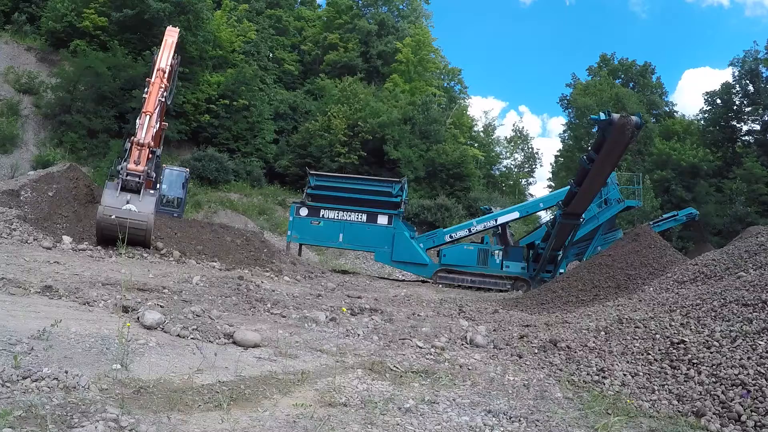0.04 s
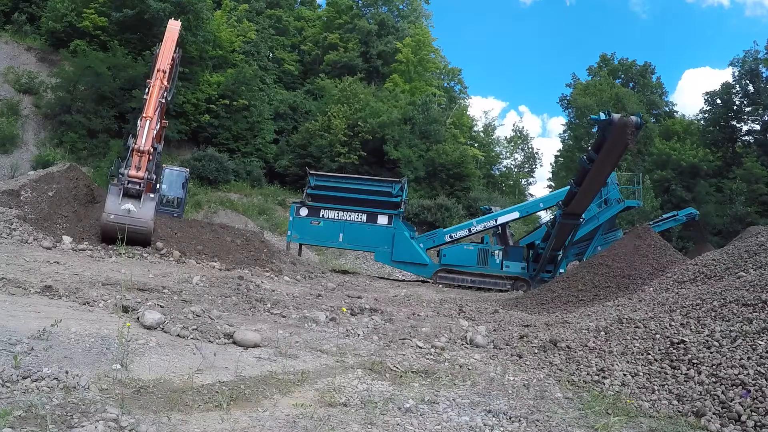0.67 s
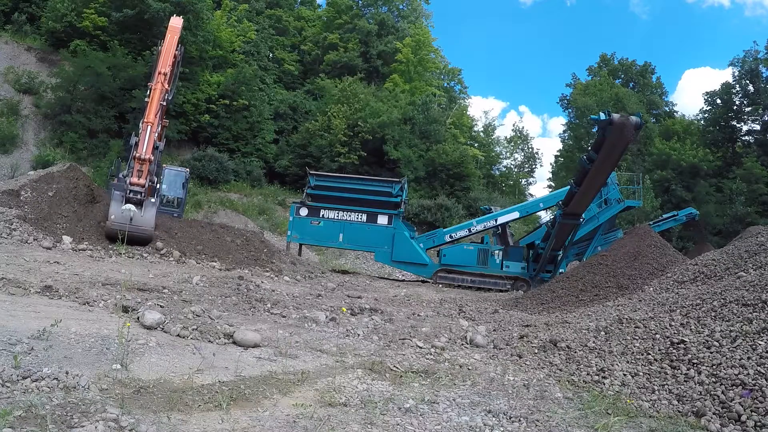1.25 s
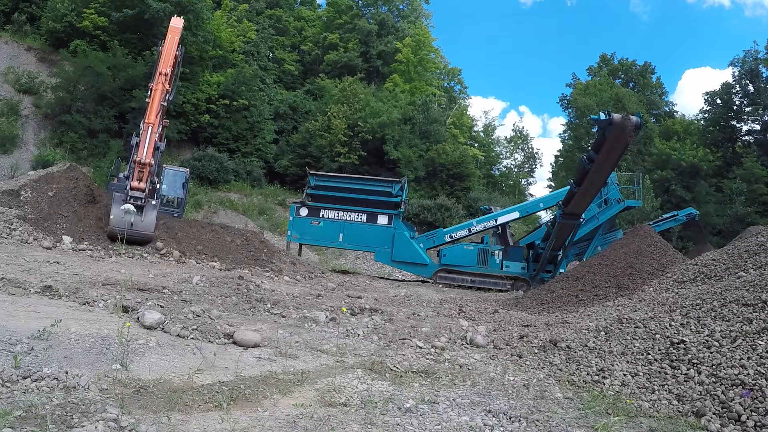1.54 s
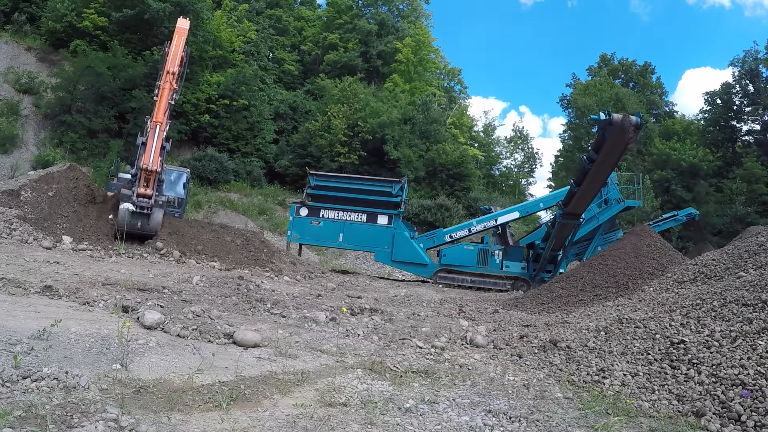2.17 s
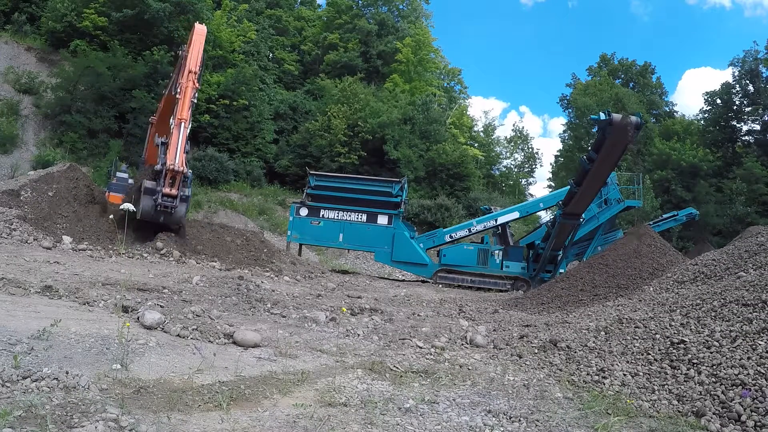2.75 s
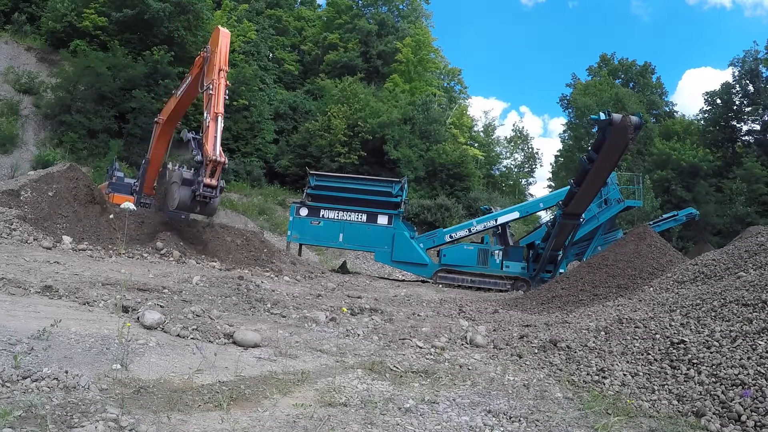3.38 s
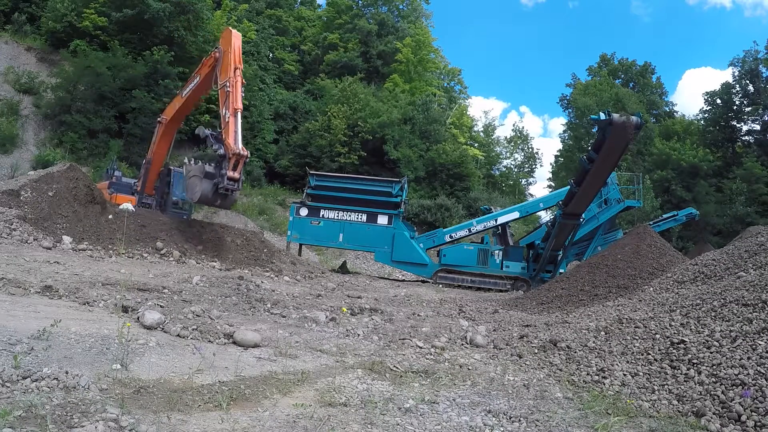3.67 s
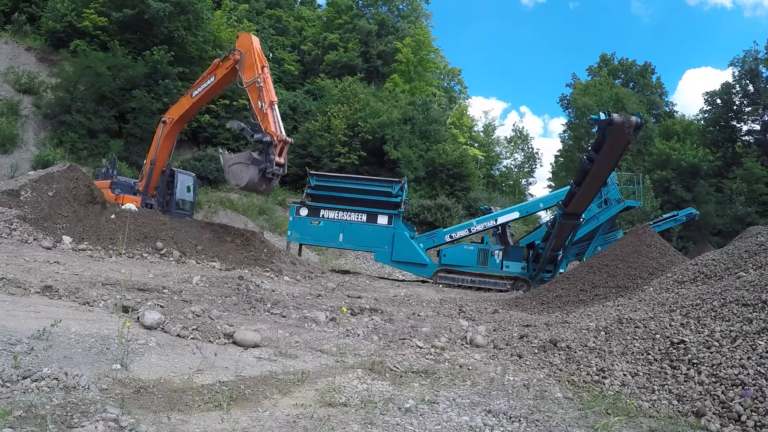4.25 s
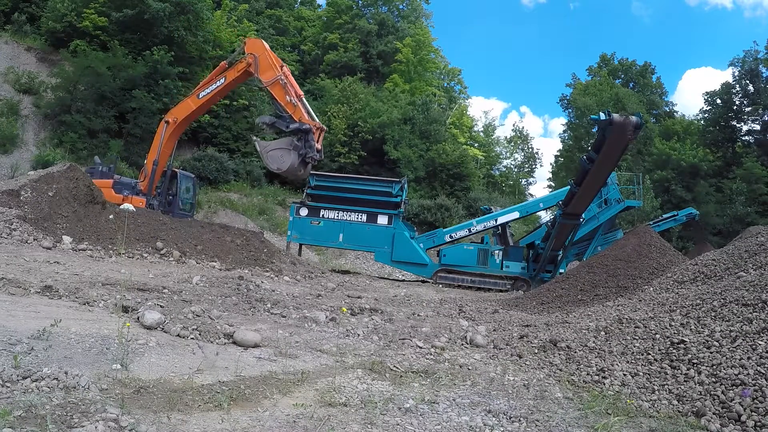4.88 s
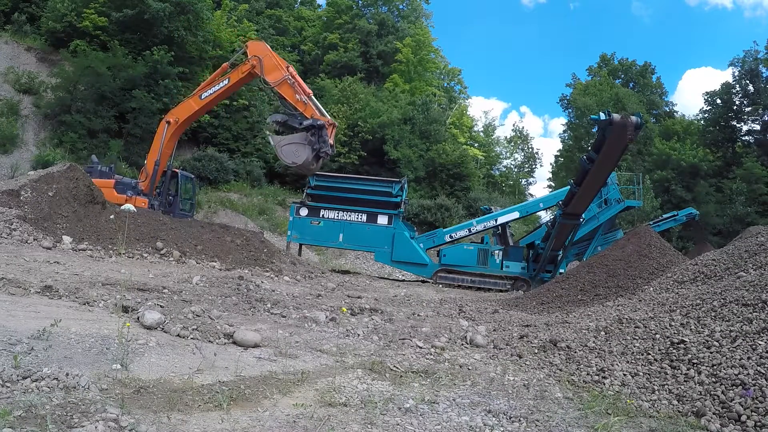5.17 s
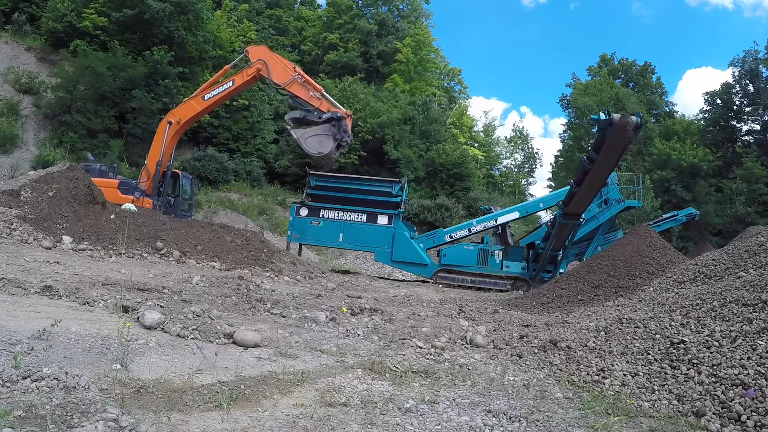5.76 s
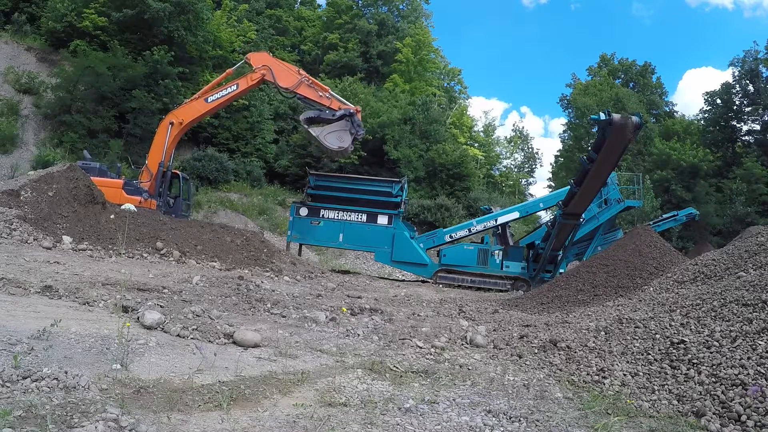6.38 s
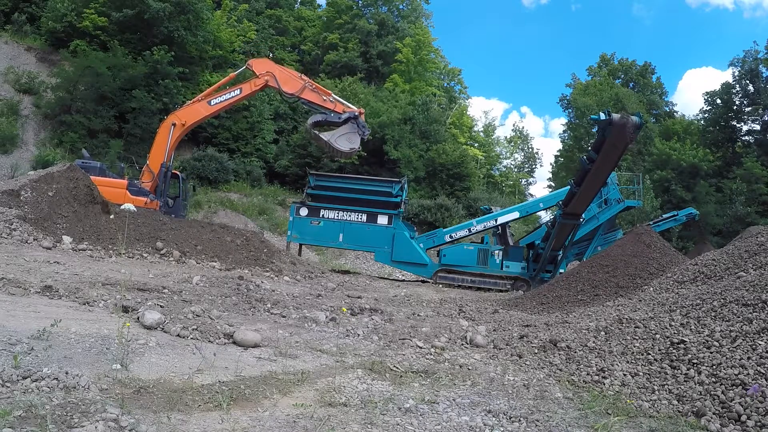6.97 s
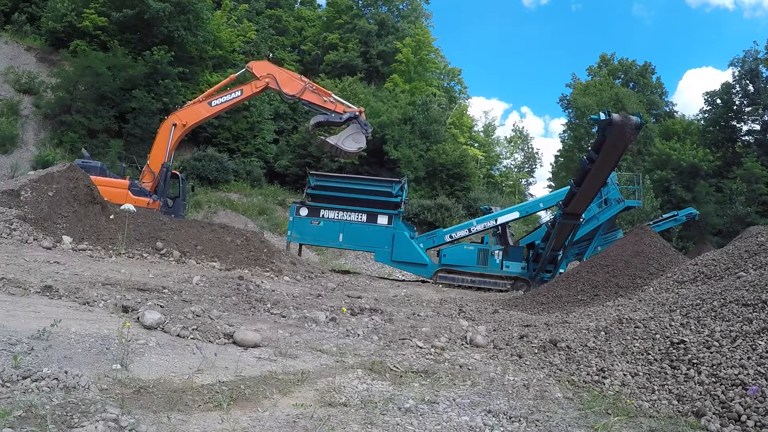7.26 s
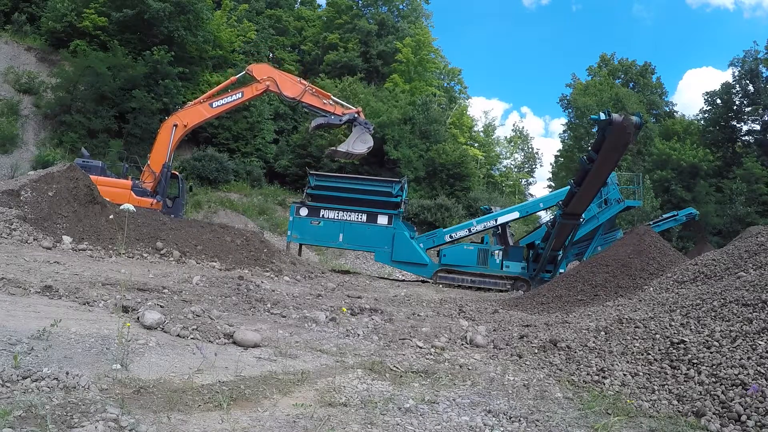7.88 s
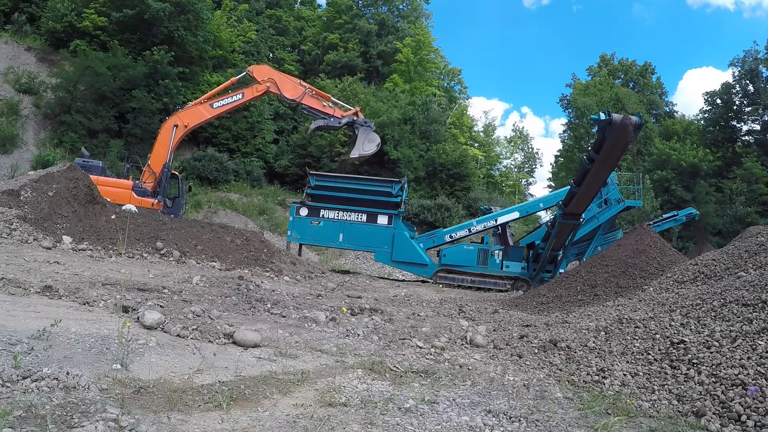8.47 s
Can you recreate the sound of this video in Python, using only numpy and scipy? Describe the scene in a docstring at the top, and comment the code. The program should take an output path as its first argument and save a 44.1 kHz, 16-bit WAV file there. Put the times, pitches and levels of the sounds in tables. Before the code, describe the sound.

A gravel screening machine rattles and sizzles over a deep diesel drone while a distant excavator thumps, growls and clanks once.

```python
"""Gravel screen across the pit

One microphone, across the pit from a screening plant and an excavator. The screen box shakes 19 times
a second, so stones rattle and ping on its deck; a loose plate chatters and two diesels drone. Dull
thumps and a boom come first, the excavator growls as it digs, then a bucket clank and another boom."""
import sys
import numpy as np
from scipy import signal
from scipy.fft import rfft, irfft, next_fast_len
from scipy.io import wavfile
from scipy.ndimage import map_coordinates

SR = 44100
rng = np.random.default_rng(int(sys.argv[2]) if len(sys.argv) > 2 else 0)


def int16_out(signal):
    """Quantize to a 16-bit WAV file."""
    q = np.round(np.clip(np.atleast_2d(signal).T, -1, 1) * 32767)
    wavfile.write(sys.argv[1], SR, q.astype(np.int16))


N = 380141
T = np.arange(N) / SR

# material passing over the deck: (time [s], level [dB])
FEED_LEVEL = [(0.13, -32), (1.3, -33), (2.9, -32.5), (3.7, -33.5), (4.6, -33.5), (6.1, -33.5), (6.6, -34),
              (7.4, -34), (8.15, -35.3), (8.5, -34.2)]
# rattle of the stones: (frequency [Hz], gain [dB])
STONE_SPECTRUM = [(915, -17), (1030, -6.5), (1200, 0.5), (1290, -6.5), (1360, -5), (1650, -7), (1760, -7.5),
                  (2170, -1.5), (2660, -6), (2740, -11), (3050, -3.5), (3210, -9.5), (3480, -7),
                  (3690, -20)]
# sizzle of the grit: (frequency [Hz], gain [dB])
GRIT_SPECTRUM = [(2150, -16), (3650, -23.5), (3740, -4), (4080, 0.5), (4280, -6), (4650, 1.5), (4960, -13),
                 (5080, -18), (5520, -4), (6070, -11.5), (7380, -13.5), (8600, -19), (10800, -22),
                 (12200, -18.5), (15000, -29.5)]
# broad resonances of the screen box: (frequency [Hz], width [Hz], gain [dB])
BOX_RESONANCES = [(1126, 47, -0.5), (1193, 28, 1.5), (2186, 25, 1), (2228, 104, -0.5), (3042, 110, -3)]
# ringing wires of the steel mesh: (frequency [Hz], relative level [dB])
MESH_MODES = [(4030, -1.5), (4085, -4), (4240, -4.5), (4480, -5), (4710, -2.5), (4807, 2), (5105, -7),
              (5320, -7.5), (5519, -2), (5585, -4.5), (5750, -11.5), (6200, -7.5), (6363, -16.5),
              (6656, -8), (6797, -7.5), (6920, -17), (7129, -4), (7245, -10), (7385, -10.5), (7610, -9),
              (7699, -17), (8150, -13.5), (8610, -15.5), (9130, -15), (9280, -18), (9600, -17.5),
              (10200, -16.5), (10770, -22), (11830, -17), (12480, -22)]
# short pours of fine grit: (middle [s], length [s], level [dB])
GRIT_POURS = [(1.3, 0.2, -52), (2.25, 0.63, -49), (2.8, 0.94, -46.5), (3.45, 0.25, -47), (5.22, 0.14, -49),
              (5.73, 0.17, -47), (6.2, 0.68, -49.5), (7.1, 0.4, -51), (8.48, 0.53, -47)]
# hiss of a pour: (frequency [Hz], gain [dB])
POUR_SPECTRUM = [(3800, -1), (5600, 2), (7200, 7), (8200, -6), (10000, -6), (12400, -7), (15000, -17)]
# large stones landing on the deck: (time [s], relative peak [dB])
STONE_CLACKS = [(0.7357, -26), (0.925, -19.5), (1.04, -20), (1.1413, -18), (1.2979, -17.5), (1.449, -18),
                (1.7724, -18), (1.789, -20), (2.2967, -30)]
# dry clack of one stone: (frequency [Hz], gain [dB])
CLACK_SPECTRUM = [(900, -8), (2200, -1), (3200, 5), (4500, -6.5), (7500, -21), (14000, -39)]
# runs of pings from a deck bar: (start [s], length [s], gap [s], relative peak [dB], pitch [Hz])
PING_RUNS = [(0.515, 0.05, 0.1, -37, 4800), (0.608, 0.05, 0.1, -39, 4500),
             (1.141, 0.25, 0.106, -34.5, 4790), (1.556, 0.05, 0.1, -33, 4807),
             (1.932, 1.0, 0.1055, -39, 4807), (2.841, 0.05, 0.11, -37, 5519), (3.257, 0.05, 0.1, -40, 4807),
             (3.865, 0.05, 0.1, -37, 4807), (4.185, 0.5, 0.212, -34, 4807),
             (4.974, 0.2, 0.147, -36.5, 4800), (5.474, 0.15, 0.094, -38.5, 4807),
             (6.044, 0.35, 0.16, -37.5, 4807), (6.116, 0.05, 0.1, -39, 5470), (8.403, 0.05, 0.1, -34, 4807)]
# deep throb near 38 Hz: (time [s], relative level [dB])
THROB_LEVEL = [(0.2, -33.5), (0.32, -38), (1.04, -25.5), (1.13, -38.0), (1.61, -41), (2.27, -29),
               (2.45, -39), (2.63, -27), (2.81, -38), (3.65, -27), (4.13, -32.0), (4.28, -47), (5.57, -30),
               (6.44, -38), (6.53, -33), (6.95, -30.0), (7.19, -37), (7.64, -40.5), (7.94, -28),
               (8.54, -34.0)]
# low booms at the pitch of the throb: (middle [s], length [s], level [dB])
LOW_BOOMS = [(0.49, 0.3, -23.5), (3.27, 0.34, -17)]
# pace of the loose plate: (time [s], rate [taps/s])
CHATTER_RATE = [(5.0, 20.16), (5.95, 21.5), (6.65, 21.5), (6.9, 20.1)]
# bouts that change how hard the plate knocks: (middle [s], length [s], extra level [dB])
CHATTER_BOUTS = [(0.53, 0.33, 5), (1.0, 0.77, 6), (1.78, 0.14, 11), (2.42, 0.44, 7.5), (3.6, 0.6, 2),
                 (4.35, 0.6, 3.5), (4.98, 1, 4.5), (5.93, 0.67, 7.5), (6.65, 0.5, -1), (8.55, 0.26, 2)]
# hollow tone of the chute: (frequency [Hz], gain [dB])
CHUTE_SPECTRUM = [(400, -22), (540, -12.5), (600, 0), (700, -1), (830, 1), (870, -10.5), (920, -18),
                  (1100, -56)]
# the excavator's growl as it digs: (middle [s], length [s], level [dB])
DIG_SWELLS = [(1.62, 1.8, -32.5)]
# dull thumps from the excavator: (time [s], peak [dB])
HULL_THUMPS = [(0.220, -16.5), (0.243, -20), (0.2905, -6.5), (0.321, -19), (0.352, -20)]
# ringing of its hull: (frequency [Hz], relative level [dB], t60 [s])
HULL_MODES = [(62.4, -10, 0.37), (124, -9, 0.13), (185.7, -6, 0.42), (243, -6, 0.11), (291, -5.5, 0.11),
              (362, -8, 0.066)]
# noise of a thump: (frequency [Hz], gain [dB])
THUD_SPECTRUM = [(150, -3), (300, -5), (480, -9), (800, -9), (950, -20)]
# contacts on the bucket: (time [s], peak [dB], dulling by a soft contact [dB/octave])
BUCKET_CLANKS = [(2.992, -24, 26), (3.0392, -8.8, 0), (3.0465, -18.5, 0)]
# ringing of the bucket: (frequency [Hz], relative level [dB], t60 [s])
BUCKET_MODES = [(1070, -3, 0.08), (1410, -2, 0.054), (1550, 8, 0.03), (1650, 5, 0.043), (2040, 1, 0.044),
                (2230, 6, 0.047), (2780, 1, 0.043), (3050, 0, 0.053), (3830, -13, .06), (4550, -15, .05)]
# noise of a clank: (frequency [Hz], gain [dB])
CRACK_SPECTRUM = [(1100, 1), (1500, 5), (1800, -1), (4300, 3), (5200, -7), (7000, -19), (12000, -33)]
# diesel firing tone: (time [s], level [dB])
FIRING_LEVEL = [(0.45, -32), (1.17, -29), (1.35, -36), (2.37, -28.5), (2.46, -38), (2.85, -33),
                (4.17, -28.5), (4.29, -35.5), (4.65, -29.5), (5.67, -39.5), (5.76, -33.5), (6.6, -28.5),
                (7.32, -42), (7.53, -30), (7.74, -28.5), (7.92, -37.5), (8.13, -31), (8.55, -30.5)]
# steady tones of engines, fans and pumps: (frequency [Hz], relative level [dB])
WHINE_TONES = [(93.5, -44), (114.3, -46), (168.5, -45.5), (224.5, -50), (243, -51.5), (348.3, -47),
               (393, -54.5), (448, -59), (695.5, -63), (1012, -56), (1069.5, -60.5), (1153, -46.5),
               (1184.5, -51), (1203.3, -48.5), (1645, -49.5)]
# exhaust rumble: (frequency [Hz], gain [dB])
EXHAUST_SPECTRUM = [(28, -7), (42, 1.5), (58, -1.5), (110, -2.5), (138, -6.5), (175, -7), (215, -8.5),
                    (288, -8), (310, -16), (380, -14), (470, -18.5), (530, -24.5), (600, -33.5)]


def gravel(shaft):
    """Stones and grit, fed in uneven surges, are tossed once a turn and land ringing box and mesh."""
    feed_db, = curves(FEED_LEVEL)
    surge = wobble(24)
    stones_db = feed_db + 0.69 * surge
    grit_db = feed_db - 13.5 + 1.13 * surge
    toss = np.cos(shaft)
    clumps = wobble(70)
    stone_hits = impacts(rate=3500, spread_db=0) * amp(0.61 * clumps + 0.12 * toss)
    stones = unit(coloured(stone_hits, STONE_SPECTRUM))
    box = unit(resonate(impacts(rate=1500, spread_db=7) * amp(0.34 * toss), BOX_RESONANCES))
    grit_hits = impacts(rate=7000, spread_db=2.5) * amp(clumps + 0.44 * toss)
    grit = unit(coloured(grit_hits, GRIT_SPECTRUM))
    rattle = amp(stones_db) * (amp(-0.26) * stones + amp(-6) * box)
    sizzle = amp(grit_db) * (amp(1.5) * grit + amp(1) * mesh(toss, t60=0.062, rate=130))
    return rattle + sizzle + pours(clumps)


def mesh(toss, t60, rate):
    """Each wire is hit by its own stones and rings briefly."""
    t = np.arange(SR // 8) / SR
    envelope = amp(-60 * t / t60) * (1 - np.exp(-t / 0.003))
    out = np.zeros(N)
    for hz, db in MESH_MODES:
        hits = impacts(rate, spread_db=6) * amp(toss)
        wire = np.sin(2 * np.pi * hz * t) * envelope
        out += amp(db) * unit(signal.oaconvolve(hits, wire)[:N])
    return unit(out)


def pours(clumps):
    """Fine grit runs in short pours, its tiny impacts merging into a hiss."""
    grains = impacts(rate=4000, spread_db=-1) * amp(1.5 * clumps)
    return swells(GRIT_POURS) * unit(coloured(grains, POUR_SPECTRUM))


def large_stones():
    """Single stones stand out: dry clacks, and pings that repeat as the deck tosses them again."""
    clacks = strikes(STONE_CLACKS, lambda: coloured(burst(t60=0.22), CLACK_SPECTRUM))
    bar_hits = [(start + delay, db, hz)
                for start, length, gap, db, hz in PING_RUNS for delay in np.arange(0, length, gap)]
    pings = strikes(bar_hits, lambda hz: ring([(hz, 0, 0.085), (hz * 1.483, -19, 0.08)], attack=0.012))
    return amp(-2.5) * clacks + amp(2) * pings


def hum_and_throb(shaft):
    """A 19 Hz hum under a deep throb near 38 Hz that twice swells into a boom."""
    throb_db, = curves(THROB_LEVEL)
    throb = amp(throb_db - 0.4 + 2 * wobble(9)) + swells(LOW_BOOMS)
    return np.sqrt(2) * (amp(-39) * np.sin(shaft) + throb * np.sin(2 * shaft + 1.4 * wobble(3.8)))


def loose_plate():
    """A plate taps about 20 times a second, hard and soft in turn, over the hollow rush of the chute."""
    hard_tap_s, rebound_db = 0.486, -2.5
    cycles = phase(curves(CHATTER_RATE)[0]) / (2 * np.pi)
    count = np.floor(cycles - np.interp(hard_tap_s, T, cycles))
    scatter_db = 3.5 * np.clip(rng.standard_normal(N), -2, 1)
    force_db = -35 + swells(CHATTER_BOUTS, height=float) + rebound_db * (count % 2) + scatter_db
    knocks = np.diff(count, prepend=count[0]) * amp(force_db)
    tap = coloured(signal.unit_impulse(SR // 8), CHUTE_SPECTRUM)
    chatter = signal.fftconvolve(knocks, tap / np.abs(tap).max())[:N]
    rush = unit(coloured(rng.standard_normal(N), CHUTE_SPECTRUM))
    return chatter + amp(-46) * rush


def excavator():
    """The machine growls under load, its hull thumps and its bucket clanks in the distance."""
    load = swells(DIG_SWELLS) * amp(2 * wobble(8))
    growl = np.sqrt(2) * load * np.sin(phase(91.3 + 1.36 * wobble(5.9)))
    return growl + strikes(HULL_THUMPS, thump) + strikes(BUCKET_CLANKS, clank)


def thump():
    """A heavy blow rings the hull's low modes under a dull thud."""
    return ring(HULL_MODES, attack=0.003) + 3.6 * coloured(burst(t60=0.083), THUD_SPECTRUM)


def clank(db_per_octave):
    """One contact cracks and rings the bucket; a soft one is dulled above 1 kHz."""
    hit = ring(BUCKET_MODES, attack=0.00066) + 1.5 * coloured(burst(t60=0.041), CRACK_SPECTRUM)
    return coloured(hit, [(500, 0), (1000, 0), (16000, -4 * db_per_octave)])


def engines():
    """The diesel bed: firing tones, drifting whines, and exhaust puffing at the firing rate."""
    firing_hz, settle_s = 74.73, 2.6
    first_db, = curves(FIRING_LEVEL)
    firing = phase(firing_hz + 0.082 * wobble(3.14))
    first = amp(first_db - 0.03 + 0.5 * wobble(7)) * np.sin(firing)
    second = amp(-37 + 0.5 * wobble(7)) * np.sin(2 * firing + rng.uniform(0, 2 * np.pi))
    whine = sum(amp(db - 1 + 0.74 * wobble(5)) * np.sin(phase(hz * (1 + 0.001514 * wobble(6))))
                for hz, db in WHINE_TONES)
    rumble_db = -35 + 5.5 * np.exp(-T / settle_s) + 1.5 * wobble(4)  # heavier at first
    puffs = rng.standard_normal(N) * (1 + 0.39 * np.cos(firing))
    rumble = amp(rumble_db) * unit(coloured(puffs, EXHAUST_SPECTRUM))
    return np.sqrt(2) * (first + second + whine) + rumble


def amp(db):
    """Decibels to gain."""
    return 10 ** (np.asarray(db) / 20)


def unit(x):
    """Scale to rms 1."""
    return x / np.sqrt(np.mean(x ** 2) + 1e-20)


def curves(rows):
    """One value per sample for each column after the time."""
    times, *columns = np.transpose(rows)
    return [np.interp(T, times, column) for column in columns]


def swells(rows, height=amp):
    """A smooth rise and fall for each row of (middle [s], length [s], level [dB])."""
    out = np.zeros(N)
    for middle, length, db in rows:
        near = np.abs(T - middle) < length / 2
        out[near] += height(db) * np.cos(np.pi * (T[near] - middle) / length) ** 2
    return out


def wobble(rate):
    """A smooth random curve, rate knots a second."""
    knots = rng.standard_normal(int(N * rate / SR) + 4)
    coarse = T[::32]
    return np.interp(T, coarse, map_coordinates(knots, [coarse * rate]))


def phase(hz):
    """Running phase of a changing frequency."""
    return 2 * np.pi * np.cumsum(hz) / SR


def coloured(x, points):
    """Causal filter through (frequency [Hz], gain [dB]) points, falling 60 dB an octave outside them."""
    m = 2 * next_fast_len(len(x) // 2 + 4096)
    f, db = np.transpose(points)
    hz = np.fft.rfftfreq(m, 1 / SR) + 1
    octaves_outside = np.maximum(np.log2(f[0] / hz), 0) + np.maximum(np.log2(hz / f[-1]), 0)
    gain_db = np.interp(np.log(hz), np.log(f), db) - 60 * octaves_outside
    cepstrum = irfft(np.log(amp(np.maximum(gain_db, -110))))
    cepstrum[1:m // 2] *= 2  # fold to minimum phase
    cepstrum[m // 2 + 1:] = 0
    return irfft(rfft(x, m) * np.exp(rfft(cepstrum)), m)[:len(x)]


def resonate(x, peaks):
    """Resonances of (frequency [Hz], width [Hz], gain [dB]), each squared for steep skirts."""
    m = next_fast_len(N + 8192)
    f = np.fft.rfftfreq(m, 1 / SR)
    body = sum(amp(db) * (2j * f * width / (hz * hz - f * f + 2j * f * width)) ** 2
               for hz, width, db in peaks)
    return irfft(rfft(x, m) * body, m)[:N]


def impacts(rate, spread_db):
    """Random contacts, rate a second, with log-normal sizes and either sign."""
    chance, size = rng.random(N, dtype=np.float32), rng.standard_normal(N, dtype=np.float32)
    at = np.flatnonzero(chance < rate / SR)
    out = np.zeros(N)
    out[at] = amp(spread_db * np.clip(size[at], -2, 2)) * np.sign(chance[at] - 0.5 * rate / SR)
    return unit(out)


def burst(t60):
    """Noise that dies away after a contact."""
    t = np.arange(SR // 2) / SR
    return rng.standard_normal(len(t)) * amp(-60 * t / t60)


def ring(modes, attack):
    """One blow on a body with modes of (frequency [Hz], level [dB], t60 [s])."""
    t = np.arange(SR // 2) / SR
    tone = sum(amp(db + rng.normal(0, 1) - 60 * t / t60) * np.sin(2 * np.pi * (hz * t + rng.random()))
               for hz, db, t60 in modes)
    return tone * (1 - np.exp(-t / attack))


def strikes(rows, sound):
    """A fresh sound at each row of (time [s], peak [dB]); further columns go to the sound."""
    out = np.zeros(N + SR)
    for start, db, *rest in rows:
        hit = sound(*rest)
        out[round(start * SR):][:len(hit)] += amp(db) * hit / np.abs(hit).max()
    return out[:N]


def scene():
    """Both machines in mono, heard from across the pit."""
    shaft_hz = 19.1 + 0.16 * wobble(3.92)
    shaft = phase(shaft_hz)
    drone = engines() + hum_and_throb(shaft)
    return (drone + gravel(shaft) + large_stones() + loose_plate() + excavator())[None]


def record(dry):
    """The microphone opens after a moment and passes nothing above its band limit."""
    open_s, fade_s, top_hz = 0.12, 0.008, 15200
    opened = dry * np.clip((T - open_s) / fade_s, 0, 1)
    m = next_fast_len(N + 8192)
    passband = np.fft.rfftfreq(m, 1 / SR) < top_hz
    return irfft(rfft(opened, m) * passband, m)[..., :N]


dry = scene()
out = record(dry)
int16_out(out)
```